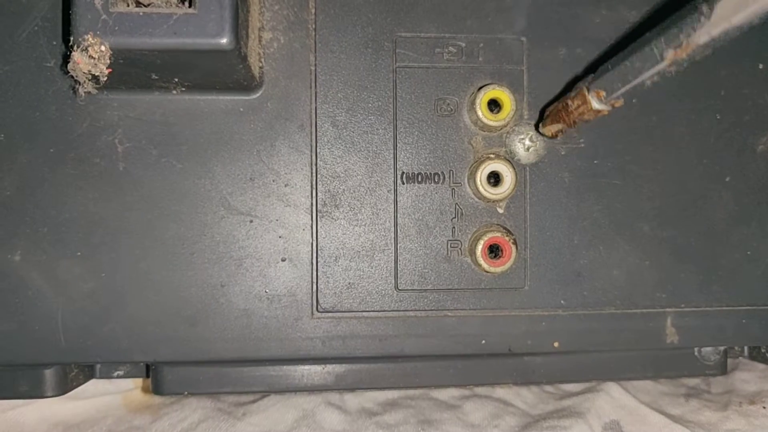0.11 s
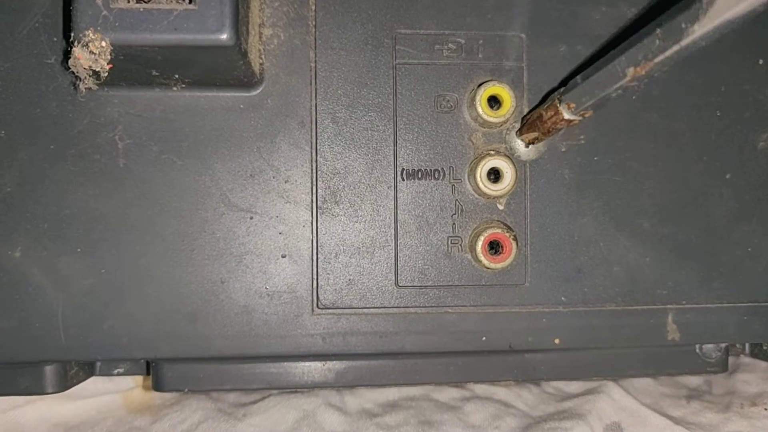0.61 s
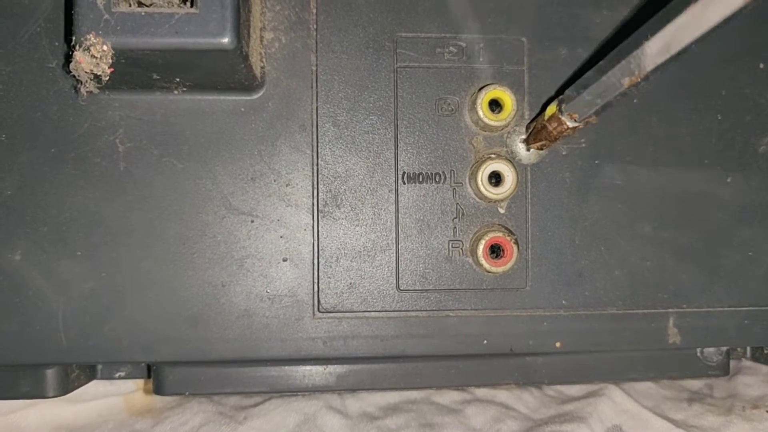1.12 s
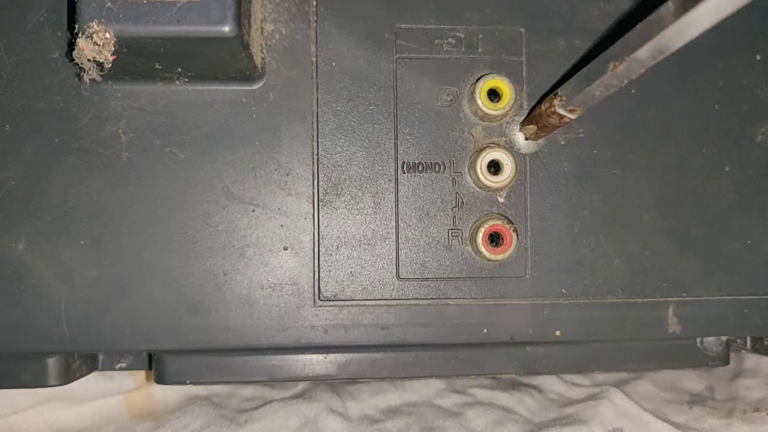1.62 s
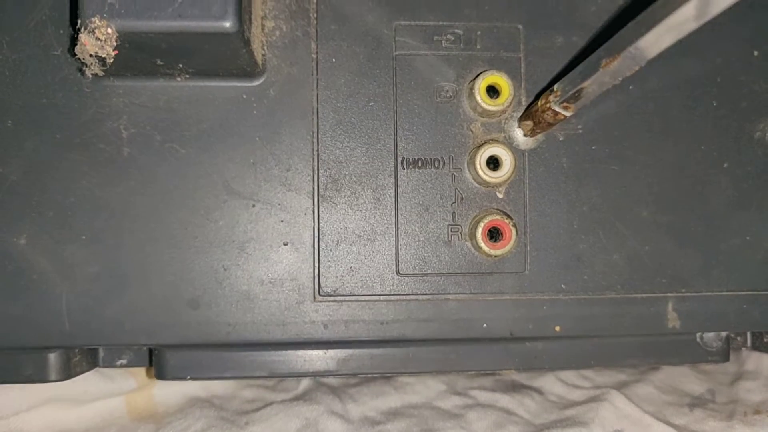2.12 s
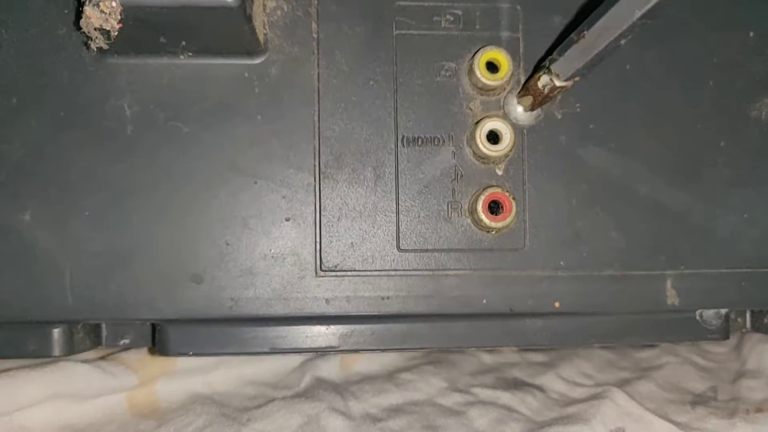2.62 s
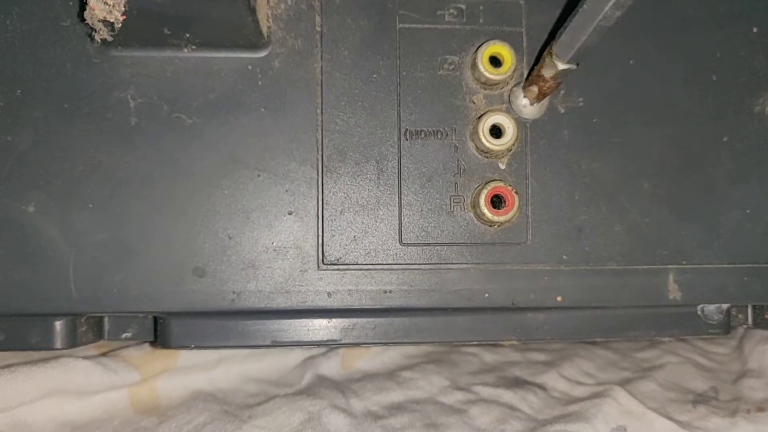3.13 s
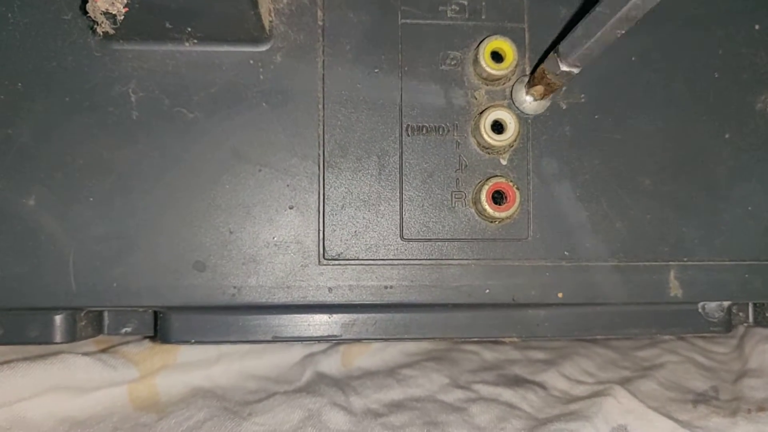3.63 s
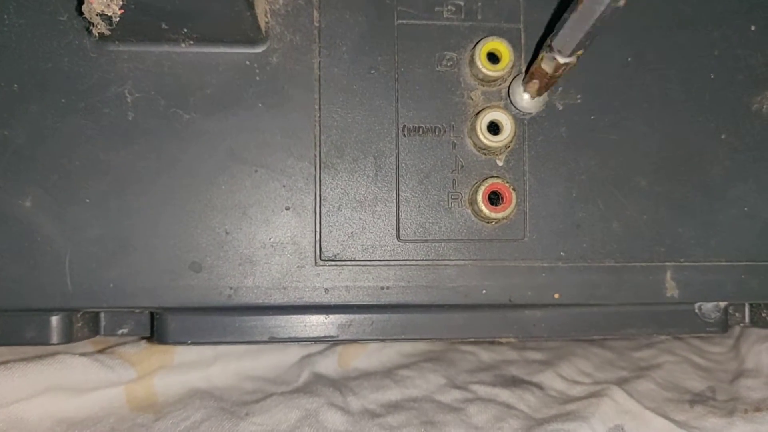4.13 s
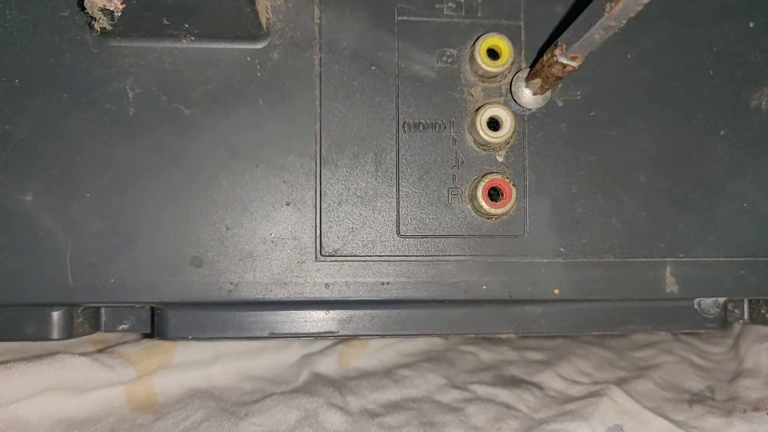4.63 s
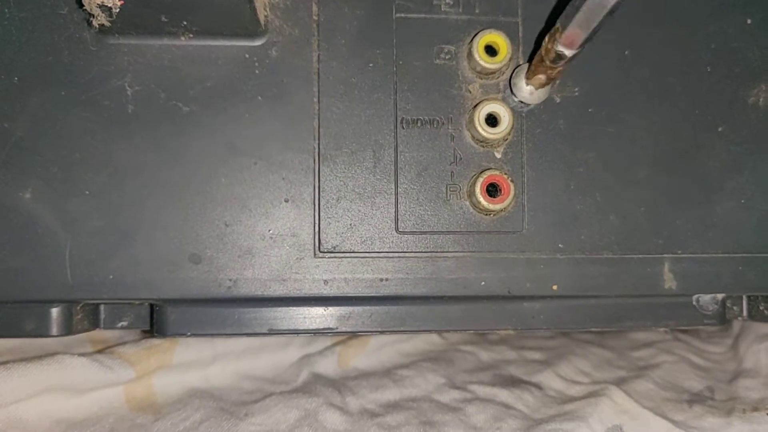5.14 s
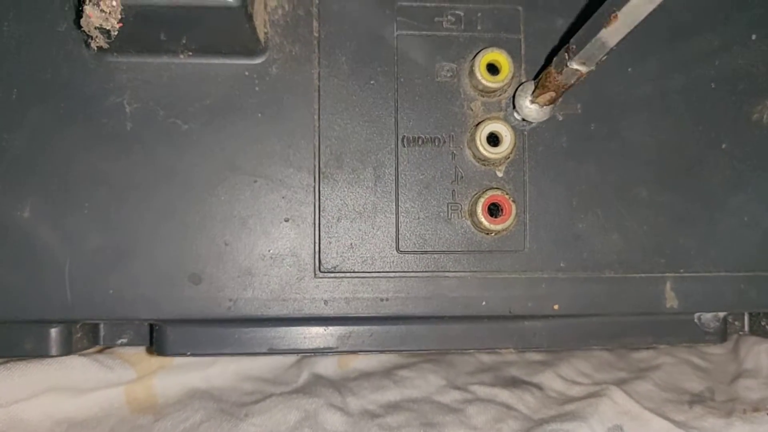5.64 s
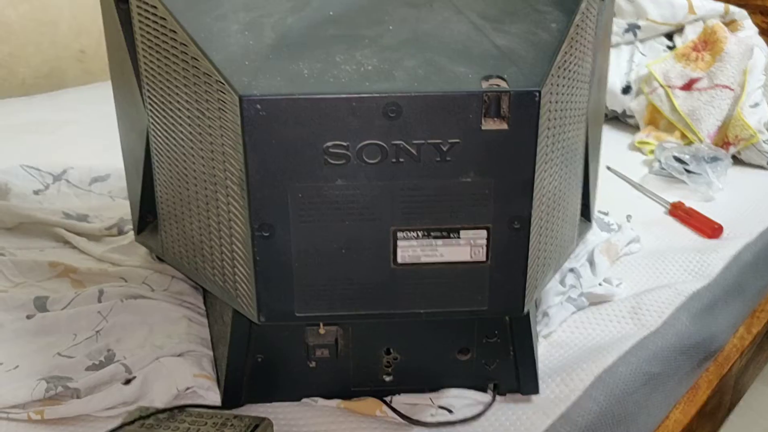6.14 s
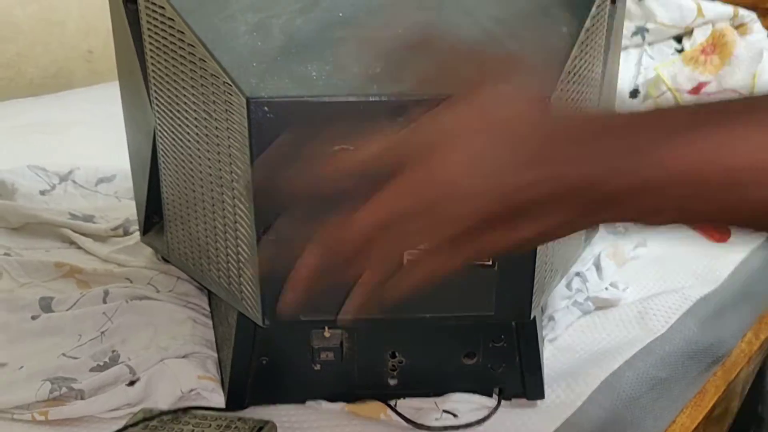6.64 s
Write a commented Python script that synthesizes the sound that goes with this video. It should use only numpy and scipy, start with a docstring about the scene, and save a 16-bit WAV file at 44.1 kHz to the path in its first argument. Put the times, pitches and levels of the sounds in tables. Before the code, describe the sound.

A close phone microphone in a small, soft-furnished room picks up faint hiss, a distant low fan hum and a soft rumble that swells and drifts like traffic through walls. At 0.24 s a steel screwdriver knocks hollow plastic sharply, followed by gritty scraping and tiny bright ticks; another cluster of knocks falls at about 0.64 s. It is mostly quiet until 1.5 s, with small taps and a tick up to 1.85 s. Firmer knocks come at 2.1 and 2.25 s, then irregular thuds, ticks and short rasping twists run almost continuously from 2.5 to 5.8 s, with stronger knocks near 4.7 and 5.74 s. At about 5.87 s tool and fan vanish abruptly. A different quiet hiss remains while the rumble continues, swelling near the end. From 6.66 s a faint, thin, high double whistle holds to the finish, around 7 s.

```python
"""A quiet room hisses and a far-off fan hums; then a steel screwdriver knocks hollow plastic, close to a phone.
It backs a screw out of the back of an old set. Each knock or twist is a push that makes the housing boom.
The tip ticks and scrapes in the screw head: short noise puffs and dense tiny slips. A low rumble swells by.
Near the end the scene cuts to a wider shot: the tool and fan are gone, the room hiss is another one,
the rumble goes on, and a faint double whistle sets in last."""
import sys
import numpy as np
from scipy import signal
from scipy.fft import rfft, irfft
from scipy.io import wavfile
from scipy.ndimage import uniform_filter1d

SR = 44100
rng = np.random.default_rng(int(sys.argv[2]) if len(sys.argv) > 2 else 0)


def boost_factor(decibels):
    """Convert a level in decibels to a linear amplitude factor."""
    exponent = np.asarray(decibels, float) / 20
    return 10 ** exponent


def unload_wav(signal):
    """Save mono or channel-first audio to the path in sys.argv[1] as 16-bit WAV at rate SR, clipped to [-1, 1]."""
    wavfile.write(
        sys.argv[1],
        SR,
        np.round(np.clip(np.atleast_2d(signal).T, -1, 1) * 32767).astype(np.int16),
    )


N = 298759
T = np.arange(N) / SR  # time of each sample in s
CUT_S = 5.871  # the close shot ends and the wide one starts
SPAN_DB = 20  # how far a swell climbs or sinks within its listed times

# blows on the housing: t/s, level/dB, favoured f/Hz, tone around 600 Hz/dB, hardness above 1 kHz/dB
# (level and both tone columns are relative)
BLOWS = [(0.239, -17, 220, -2, -1.5), (0.308, -37, 132, -23, -4), (0.631, -22.5, 217, 2, -18),
         (0.642, -21.5, 213, 13, -5), (0.652, -22, 225, -6, -5), (1.523, -40, 151, -19, -13),
         (1.643, -26, 393, -14, -15), (1.753, -37, 297, -17, -40), (2.116, -21.5, 420, -16, -12),
         (2.248, -22, 210, 3, -9), (2.265, -29, 244, -4, -10), (2.306, -35.5, 194, 8, -1),
         (2.481, -34, 210, -14, -13.5), (2.501, -40, 166.6, -3, -18), (2.591, -41, 205, 0, -4),
         (2.634, -31.5, 137, -5, -3), (2.749, -31, 228, -25, -29), (2.859, -34, 218, -29, -19),
         (2.948, -36, 228, -16, -30), (3.035, -28.5, 137.4, -10, -21), (3.055, -26.5, 154, -11, -19),
         (3.179, -43, 180, -20, -18), (3.246, -33, 210, 9, -7), (3.284, -31.5, 238, -12, -25),
         (3.324, -33, 266, -24, -33), (3.366, -26.5, 227, -10, -14.5), (3.517, -35, 233, -28, -37),
         (3.585, -28.5, 156, -6, -12.5), (3.607, -27.5, 210, -1, -17), (3.679, -28.5, 176, -5, -33),
         (3.698, -35, 275, -7, -13.5), (3.741, -25, 140, -5.5, -28), (3.772, -33, 290, -17, -16),
         (3.956, -36.5, 207, -3, -21), (4.05, -29.5, 250, -10, -27), (4.279, -35.5, 195, -7.5, -12),
         (4.388, -35.5, 128.8, 7, -1), (4.614, -36.5, 202, -13, -29), (4.668, -32.5, 220, -24, -22),
         (4.712, -22, 221, 5, -7), (4.789, -29, 132, -31, -30), (4.928, -36.5, 216.6, 0, -21),
         (4.96, -32.5, 226, 1, -11), (5.023, -34.5, 280, 8, 4), (5.158, -37, 506, -14, -22),
         (5.338, -35.5, 255, -15, -18), (5.49, -44, 233, -27, -23), (5.637, -35, 210, -9, -20),
         (5.663, -36.5, 186, -5, -19), (5.744, -18.5, 182, 2, -13)]
# ways the plastic housing vibrates: f/Hz, level/dB, time to die by 60 dB/s (before any damping)
HOUSING_MODES = [(141.4, -1.5, 0.27), (188, -5, 0.16), (226, -3.5, 0.27), (283.6, -0.5, 0.12),
                 (343.8, -3.5, 0.088), (440, -6, 0.037), (490, -8, 0.071), (555, -21, 0.4),
                 (614, -8.5, 0.08), (694, -17, 0.094), (778, -10, 0.033), (850, -11.5, 0.049),
                 (1023, -9.5, 0.033), (1205, -8.5, 0.02), (1385, -10.5, 0.0086), (1553, -25.5, 0.035),
                 (1730, -16, 0.012), (2118, -24.5, 0.035), (2367, -22, 0.025), (2840, -29.5, 0.035)]
# the tip slipping in the screw head: t/s, peak level/dB, ring f/Hz, top end level/dB, left over right/dB
TIP_TICKS = [(0.2407, -28, 6360, -47, 0), (0.294, -39, 6710, -34, -4), (0.3146, -41, 6360, -33, -2.0),
             (0.329, -45, 6400, -26, -3.0), (0.3414, -43, 7080, -28, -2.0), (0.3596, -46, 6770, -27, -1.5),
             (0.413, -41, 6610, -24, 0.5), (0.4475, -39, 6660, -37, -2), (0.633, -48, 6500, -34, -4.0),
             (0.6407, -38, 6500, -42, -4), (0.6512, -30.5, 6800, -48, 11), (0.834, -48, 6485, -29, 1),
             (1.6442, -38.5, 6340, -31, -4), (1.8341, -31, 5470, -27, -5), (2.1178, -36, 5500, -23, -10),
             (2.1253, -23.5, 5850, -41, -29), (2.265, -36, 5770, -40, -7), (2.3083, -51, 5730, -28, -0.5),
             (2.4503, -48, 6480, -14, -3.0), (2.479, -32, 5870, -27, 4.0), (2.499, -26, 5780, -21, 0.0),
             (2.5134, -42, 5620, -30, -0.5), (2.573, -43, 6740, -26, 0), (2.592, -30.5, 6700, -39, -9),
             (2.6364, -40, 6210, -18, -4.0), (2.6635, -39, 5990, -30, -10.0), (2.8575, -36, 6200, -23, 2.5),
             (2.9996, -41, 5880, -20, 0.0), (3.0343, -31, 6350, -18, -1.5), (3.1796, -37, 5800, -31, 0),
             (3.215, -40, 6300, -28, -3.5), (3.2485, -33.5, 6090, -31, -6),
             (3.2885, -26.5, 6420, -45, -0.5), (3.3314, -37, 6410, -27, -1.5),
             (3.3637, -39, 6340, -30, -3.0), (3.5074, -39.5, 6340, -33, -5), (3.6086, -45, 6240, -22, -3.0),
             (3.699, -32, 4600, -37, -11), (3.7415, -26, 6370, -46, -3), (4.0277, -35, 6400, -29, -3.5),
             (4.343, -42, 6180, -28, -0.5), (4.411, -40, 6270, -33, -3), (4.6733, -35, 6500, -24, -4),
             (4.7134, -33.5, 6030, -37, -4), (4.7578, -35, 6200, -33, -2.0), (4.8304, -46, 6170, -29, 1.5),
             (4.9588, -29, 6250, -40, 1), (4.9955, -43, 6170, -27, -6), (5.1581, -40.5, 5380, -30, -9),
             (5.2984, -49, 4900, -24, -2.0), (5.332, -34, 6500, -30, -3), (5.3947, -40, 5090, -26, -1.5),
             (5.511, -41, 5730, -25, -1.5), (5.5258, -33.5, 6260, -27, 3.5), (5.6034, -35.5, 7000, -39, -1),
             (5.6243, -38, 6910, -30, -14), (5.663, -32, 6100, -43, -6), (5.682, -39, 6550, -30, -1.0),
             (5.7114, -46, 6410, -28, -2.0), (5.745, -35, 6040, -32, 0), (5.7564, -42, 6400, -31, -1.5)]
# tone of every tick: f/Hz, level/dB
TICK_TONE = [(400, -43), (1000, -15), (2000, -17.5), (3500, -11), (5000, -7), (6400, 0), (7800, -15.5),
             (9500, -29)]
# tone of the scraping tip: f/Hz, level per Hz/dB
SCRAPE_TONE = [(800, -15), (1300, -20), (2200, -18.5), (3000, -15), (4200, -16.5), (5200, -9), (5900, -9),
               (6400, -1), (7000, -12.5), (8200, -20.5), (9900, -32), (15500, -42)]
# the screw giving way under the hand, a push that builds and lets go:
# peak t/s, thread drag level/dB, tip scrape level/dB, build-up/s, fade/s (both times for SPAN_DB)
SCREW_SLIPS = [(.243, -40, -40, .003, .06), (.262, -32.5, -49, .01, 0.098), (.42, -43.5, -54, 0.019, .1),
               (.452, -46.5, -52.5, .12, 0.025), (0.659, -36.5, -57.5, 0.0076, 0.094),
               (1.45, -60, -55.5, .02, 0.071), (1.555, -52, -59.5, 0.33, 0.024),
               (1.679, -47, -67, 0.0069, .045), (1.76, -52, -57.5, 0.029, 0.16),
               (1.834, -50, -75, .02, 0.023), (2.135, -46, -80, 0.007, 0.098),
               (2.263, -36.5, -48, 0.057, 0.23), (2.5, -43, -54, 0.073, 0.077),
               (2.6, -59, -50, 0.083, 0.23), (2.654, -38.5, -43, 0.088, 0.051),
               (2.752, -41.5, -53, 0.078, 0.21), (2.86, -55.5, -55.5, 0.15, 0.29),
               (3.02, -42, -49.5, 0.11, .05), (3.038, -42, -42, .004, .07), (3.07, -38, -54, 0.017, 0.051),
               (3.212, -44, -66, .006, 0.049), (3.23, -38.5, -64, 0.023, .1),
               (3.254, -37, -42.5, .01, 0.0091), (3.29, -53, -66, .03, .3), (3.388, -38, -48.5, 0.18, .08),
               (3.51, -53, -59, 0.033, 0.084), (3.62, -42, -66, 0.065, 0.26),
               (3.649, -51, -48, 0.013, 0.15), (3.7, -37.5, -45.5, 0.058, 0.073),
               (3.76, -43, -57, .02, 0.14), (3.954, -47.5, -75, 0.033, 0.13),
               (4.05, -39.5, -48.5, .1, 0.094), (4.285, -43.5, -60.5, 0.035, .08),
               (4.354, -44, -46.5, 0.02, 0.051), (4.401, -41, -52, .12, 0.14), (4.62, -46, -68, .02, .3),
               (4.674, -49, -47.5, 0.016, 0.15), (4.73, -32.5, -54, 0.062, 0.038),
               (4.93, -50, -76, 0.026, 0.35), (5.02, -38.5, -48.5, 0.05, 0.11),
               (5.162, -53.5, -59, 0.032, 0.5), (5.335, -44, -54.5, 0.11, 0.19),
               (5.52, -48.5, -60.5, 0.15, 0.11), (5.637, -50.5, -59, .04, .3),
               (5.736, -38.5, -48, .05, 0.074), (5.768, -30, -70, 0.059, 0.053)]
# low booms: peak t/s, level/dB, f/Hz before wavering, half-length/s for SPAN_DB (under 0.001 acts as 0.001)
BOOM_SWELLS = [(0.284, -49, 81.6, -0.34), (0.729, -46, 64, -0.64), (1.077, -47, 74.7, 0.32),
               (1.3, -57, 63.1, -9.5), (1.659, -48, 63, -0.1), (2.15, -45, 60, 0.07), (2.56, -50, 60.3, 1),
               (2.792, -42, 61, -1.2), (3.142, -45, 59.7, 0.3), (3.62, -50, 65.5, 0.8),
               (4.04, -41.5, 63, 0), (4.353, -58, 71, -4.5), (4.75, -45.5, 63.4, 0.36),
               (5.2, -51, 63.4, 2.5), (5.837, -36.5, 62.4, 0.17), (5.996, -60, 64.94, -1.5),
               (6.402, -57.5, 58, .2), (6.625, -48.5, 66, 1.25), (6.77, -38, 68, -0.35)]
# the two tones of the whistle: f/Hz, relative level/dB
WHISTLE_PAIR = [(2580, -5), (2733, -13)]
# hum of the fan: mean f/Hz, level/dB before wavering
FAN_HUM = [(123, -53.5), (150, -58), (197, -64.5)]
# tone of the room hiss, close shot: f/Hz, relative level per Hz/dB
CLOSE_HISS = [(20, 6.5), (40, 0.5), (100, 3.5), (130, 1.5), (200, -7), (260, -9), (630, -16), (1000, -21.5),
              (2000, -24.5), (5000, -25), (6500, -22), (8000, -34.5), (10000, -38.5), (15800, -35)]
# tone of the room hiss, wide shot: f/Hz, relative level per Hz/dB
WIDE_HISS = [(12, -39), (20, -9), (27, -13.5), (65, 2), (79, -28), (95, -7.5), (233, -19), (335, -17.5),
             (510, -21.5), (554, -22), (1470, -32), (6120, -29), (8790, -32.5), (9830, -48), (15800, -44)]
# how alike the hiss is left and right: f/Hz, likeness (1 = same, 0 = unrelated, below 0 = opposed)
HISS_LIKENESS = [(60, 0.69), (180, 1), (550, 0.4), (1650, -0.14), (4970, -0.018), (15000, 0.01)]


def evened(x):
    """Scales to an rms of 1."""
    return x / np.sqrt(np.mean(x ** 2) + 1e-20)


def read(points, hz):
    """Reads a table of f/Hz and value at any pitch, on a log-frequency axis."""
    f, value = np.transpose(points)
    return np.interp(np.log(hz + 1), np.log(f + 1), value)


def add(mix, s, sound):
    """Mixes a two-channel sound in at time s, cut off at the end of the mix."""
    part = mix[:, round(s * SR):][:, :sound.shape[1]]
    part += sound[:, :part.shape[1]]


def colour(x, points):
    """Makes each pitch of x louder or softer by the dB in the points."""
    length = x.shape[-1]
    gain = boost_factor(read(points, np.fft.rfftfreq(length, 1 / SR)))
    return irfft(rfft(x) * gain, length)


def humps(s, db, rise, fall):
    """Power sum of peaks that climb and sink SPAN_DB in the given times."""
    coarse_t = T[::64]
    late = coarse_t - np.asarray(s)[:, None]
    rise, fall = np.maximum(rise, .001)[:, None], np.maximum(fall, .001)[:, None]
    slope_db = SPAN_DB * np.where(late < 0, late / rise, -late / fall)
    power = (boost_factor(db[:, None] + slope_db) ** 2).sum(0)
    return np.interp(T, coarse_t, np.sqrt(power))


def housing_modes():
    """One dying sine a mode and channel; the two microphones differ more in phase as the pitch rises."""
    hz, db, t60 = np.transpose(HOUSING_MODES)[:, :, None]
    t = T[:SR // 3]
    apart = np.clip(hz / 2600, 0, 1) * rng.uniform(-np.pi / 2, np.pi / 2, hz.shape)
    fade = boost_factor(db - 60 * t / t60)
    return np.array([fade * np.sin(2 * np.pi * hz * t + side * apart) for side in (1, -1)])


def knocks(modes):
    """Each blow is a brief push and a short chatter; where it lands favours some modes and mutes those below."""
    chatter_s = 0.0086  # how long the tip rattles after a blow
    stiff_hz = 257  # blows pitched above this rattle less and die faster
    panel_edge_hz = 110  # the panel sends out little bass below this
    tock_db, tock_t60_s = -3, 0.033  # the struck spot gives a short tock at the favoured pitch
    hz, out = np.transpose(HOUSING_MODES)[0], np.zeros((2, N))
    t = T[:modes.shape[2]]
    chance = rng.standard_normal((len(BLOWS), SR // 10))
    signs = rng.choice([-1., 1.], (len(BLOWS), len(hz)))  # each spot moves each mode in or out
    for (s, db, pitch, middle_db, hard_db), grit, sign in zip(BLOWS, chance, signs):
        octaves = np.log2(hz / pitch)
        near_db = 6 * np.exp(-(octaves / 0.41) ** 2) + 12 * np.minimum(octaves, 0)
        tone = [(300, 0.0095), (480, 0.16 * (middle_db + 9.5)), (680, middle_db + 14),
                (1100, hard_db + 14.0), (2400, 0.87 * (hard_db + 25.0))]
        tone_db = read(tone, hz)
        rattle_fade = np.exp(-T[:len(grit)] / chatter_s * max(pitch / stiff_hz, 1) ** 2)
        force = 0.024 * grit * rattle_fade
        force[0] = 1  # the blow itself
        force = uniform_filter1d(force, size=9, mode="constant")  # the tip stays in contact for a moment
        held = boost_factor(-1.5 * max(pitch - stiff_hz, 0) * t)  # the stiff spot by the screw dies faster
        body = sign * boost_factor(near_db + tone_db) @ modes * held
        tock = boost_factor(tock_db - 60 * t / tock_t60_s) * np.sin(2 * np.pi * pitch * t) * abs(body).max()
        sound = signal.fftconvolve(body + tock, force[None], axes=1)
        add(out, s + 0.000953, boost_factor(db - 15.0) * sound / np.std(sound[:, :SR // 10]))
    no_bass = signal.lfilter(*signal.butter(2, panel_edge_hz, "high", fs=SR), out)
    return no_bass * boost_factor([[.8], [-.8]])  # a little more on the left


def ticks():
    """Steel on steel: a puff of a millisecond or two, broad, with one bright ring."""
    attack_s, fade_s = 0.00018, .0011
    lead = 64  # samples kept free ahead of the puff, taken off again when it is mixed in
    out, t = np.zeros((2, N)), T[:1024]
    chance = rng.standard_normal((len(TIP_TICKS), 3, len(t)))
    for (s, db, hz, top_db, pan_db), (both, *own) in zip(TIP_TICKS, chance):
        noise = both + 3.2 * np.array(own)  # a part both sides share, and one for each side
        puff = noise * np.minimum(t / attack_s, 1) * np.exp(-t / fade_s)
        tone = TICK_TONE + [(12000, top_db - 2), (16000, top_db + 5)]
        ring = [(hz * .92, 0), (hz, 5), (hz * 1.1, 0)]
        sound = colour(colour(np.roll(puff, lead, 1), tone), ring)
        sound *= boost_factor(np.array([[pan_db], [-pan_db]]) / 2)
        add(out, s - lead / SR, boost_factor(db) * sound / abs(sound.mean(0)).max())
    return out


def effort():
    """Gains of scrape, drag and rasp as the hand pushes; the rasp follows the drag, more steeply."""
    turning_s, lean_drag_db, lean_scrape_db = 3.1, -60.5, -66.5  # from here the tip leans between slips
    grit_db, grit_s = 3.5, 0.009  # the scrape comes in uneven bursts
    lump_db, lump_s = 2, .015  # the thread sticks and frees itself unevenly
    rasp_db, rasp_at_db, rasp_growth = -53.5, -38.5, 1.1  # rasp at that drag, dB gained per dB of drag
    s, drag_db, scrape_db, rise, fall = np.transpose(SCREW_SLIPS)
    lean = T > turning_s
    grit = evened(uniform_filter1d(rng.standard_normal(N), size=round(grit_s * SR)))
    lumps = evened(uniform_filter1d(rng.standard_normal(N), size=round(lump_s * SR)))
    scrape = np.hypot(humps(s, scrape_db, rise, fall), boost_factor(lean_scrape_db) * lean) * boost_factor(grit_db * grit)
    drag = np.hypot(humps(s, drag_db, rise, fall), boost_factor(lean_drag_db) * lean) * boost_factor(lump_db * lumps)
    rasp = boost_factor(rasp_db) * (drag / boost_factor(rasp_at_db)) ** rasp_growth
    return scrape, drag, rasp


def twist(modes):
    """Tiny slips, denser than the ear can count: bright at the tip, booming through the housing at the thread."""
    tip_rate, thread_rate = 3500, 1500  # mean slips per second
    size = boost_factor(1.54 * np.minimum(rng.exponential(1, (3, N)), 5)) * rng.choice([-1., 1.], (3, N))
    slips = size * (rng.random((3, N)) < tip_rate / SR)
    scrape, drag, rasp = effort()
    tip = evened(colour(slips[0] + 3.0 * slips[1:], SCRAPE_TONE))  # shared slips plus each side's own
    out = tip * boost_factor([[-2.5], [-.5]]) * scrape
    drag_size = rng.standard_normal(N) * boost_factor(3.0 * np.minimum(rng.exponential(1, N), 4))
    drags = evened(drag_size * (rng.random(N) < thread_rate / SR))
    high = np.transpose(HOUSING_MODES)[0] > 800  # Hz
    sign = (-1.) ** np.arange(len(high))
    damping = boost_factor(-250 * T[:modes.shape[2]])  # the tool pressed on the panel damps it, by 250 dB/s
    # soft drags reach only the low modes, a harsh rasp the high ones
    for part, gain in ((~high, drag), (high, rasp)):
        body = sign[part] @ modes[:, part] * damping
        body = body / np.linalg.norm(body[0])
        out = out + signal.oaconvolve(drags[None] * gain, body, axes=1)[:, :N]
    return out


def walls(x):
    """A short soft-furnished room: dull decaying noise, another tail for each channel."""
    t = T[:SR // 4]
    tail = rng.standard_normal((2, len(t))) * boost_factor(-60 * t / 0.074) * (t > .003)
    tail = colour(tail / np.linalg.norm(tail[0]), [(100, -20.5), (1000, -5), (6000, -15.5)])
    return signal.oaconvolve(x, tail, axes=1)[:, :N]


def rumble():
    """A soft boom that swells and drifts in pitch, as traffic through walls; the cut chops the swell under way."""
    s, db, hz, half = np.transpose(BOOM_SWELLS)
    early = s < CUT_S
    before, after = [humps(s[shot], db[shot], half[shot], half[shot]) for shot in (early, ~early)]
    swell = np.where(T < CUT_S, before, after)
    waver_hz = uniform_filter1d(rng.standard_normal(N), 4000) * 150
    turns = np.cumsum(np.interp(T, s, hz) + waver_hz) / SR
    turns -= turns[round(CUT_S * SR)]  # the wave stands at its crest at the cut
    return np.sqrt(2) * swell * np.cos(2 * np.pi * turns)


def whistle():
    """Two close thin, high tones, faint, that set in together and hold."""
    start_s, rise_s, level_db = 6.66, .015, -61.5
    tones = sum(boost_factor(tone_db) * np.sin(2 * np.pi * (hz * T + rng.random())) for hz, tone_db in WHISTLE_PAIR)
    return evened(tones) * boost_factor(level_db) * np.clip((T - start_s) / rise_s, 0, 1)


def fan():
    """Low hum lines, steady with a slight waver in level and pitch."""
    waver = evened(uniform_filter1d(rng.standard_normal((len(FAN_HUM), N)), 6000, axis=1))
    hum = np.zeros(N)
    for (hz, db), w in zip(FAN_HUM, waver):
        turns = np.cumsum(hz + 1.413 * w) / SR
        hum += np.sqrt(2) * boost_factor(db + 1.43 * w) * np.sin(2 * np.pi * turns)
    return hum


def hiss(points, db, patchy_db):
    """Room air and microphone noise: random short-time spectra with faint drifting patches."""
    frames, hz = N // 256 + 5, np.fft.rfftfreq(1024, 1 / SR)
    a, b, c, d, patches = rng.standard_normal((frames, 513, 5)).T
    patches = evened(uniform_filter1d(uniform_filter1d(patches, 12, 0), 14, 1))
    same = np.clip(read(HISS_LIKENESS, hz), -1, 1)[:, None]
    left = a + 1j * b
    right = same * left + np.sqrt(1 - same ** 2) * (c + 1j * d)
    spectra = np.array([left, right]) * boost_factor(read(points, hz)[:, None] + patchy_db * patches)
    sound = signal.istft(spectra, nperseg=1024, noverlap=768)[1][:, :N]
    return boost_factor(db) * evened(sound)


def scene():
    """The close shot up to the cut, then the wide one; the rumble runs through both."""
    modes = housing_modes()
    tool = knocks(modes) + ticks() + twist(modes)
    close = tool + walls(tool) + hiss(CLOSE_HISS, db=-51, patchy_db=1.0) + fan()
    wide = hiss(WIDE_HISS, db=-51, patchy_db=0.56) + whistle()
    return np.where(T < CUT_S, close, wide) + rumble()


def top_cut(x):
    """Nothing passes above the cut-off."""
    return signal.sosfilt(signal.butter(12, 16520, fs=SR, output="sos"), x)


def record(dry):
    """The phone's band limit: a steep filter takes away the treble above its edge."""
    edge_hz = 15750
    low_pass = signal.firwin(511, edge_hz, window=("kaiser", 9), fs=SR)
    limited = signal.oaconvolve(dry, low_pass[None], "same")
    return top_cut(limited)


dry = scene()
out = record(dry)
unload_wav(out)
```